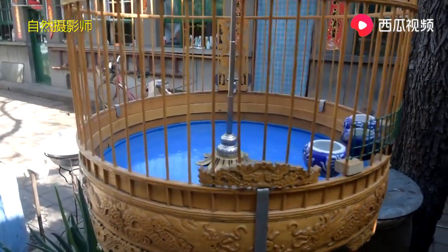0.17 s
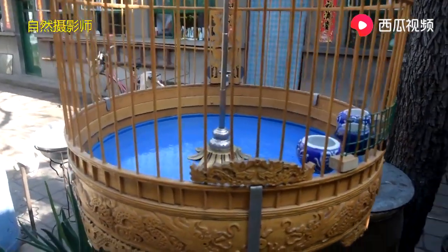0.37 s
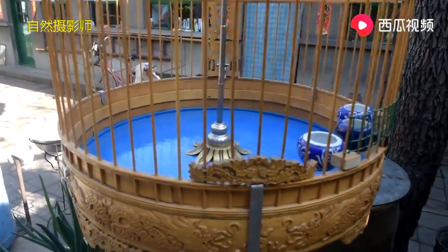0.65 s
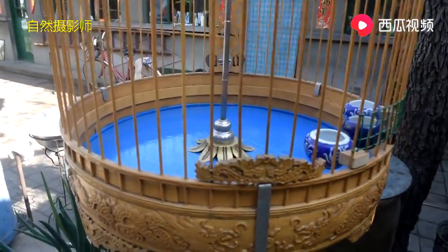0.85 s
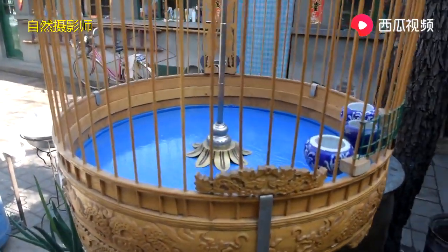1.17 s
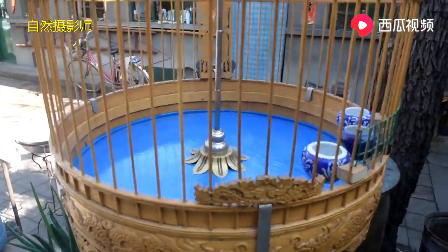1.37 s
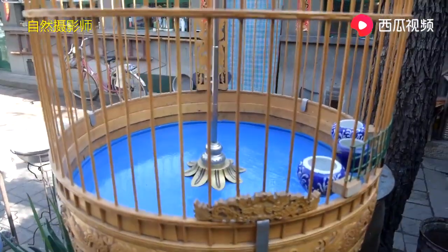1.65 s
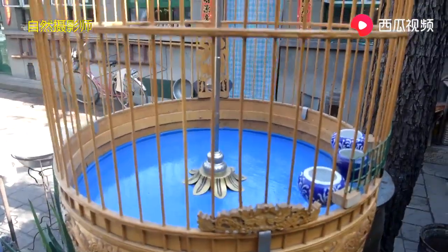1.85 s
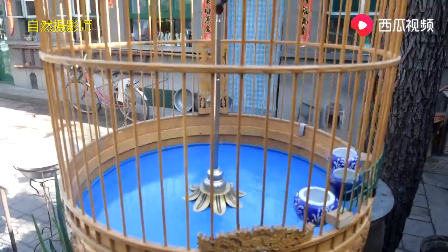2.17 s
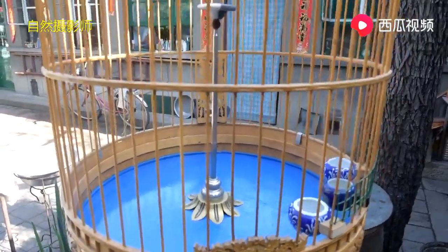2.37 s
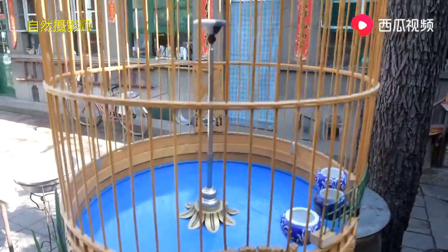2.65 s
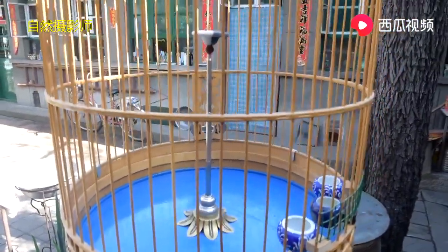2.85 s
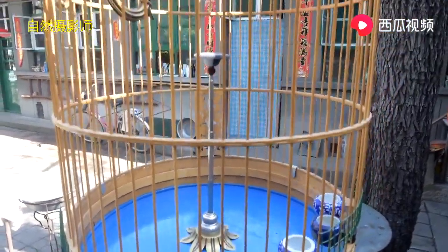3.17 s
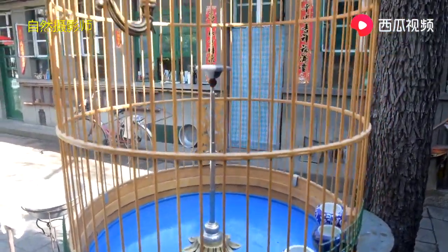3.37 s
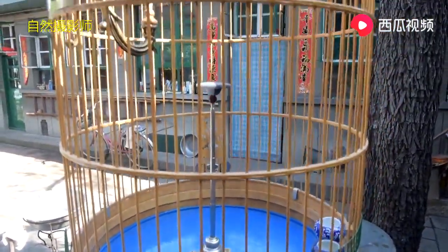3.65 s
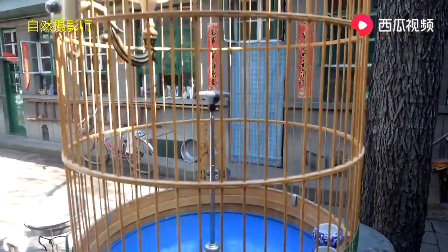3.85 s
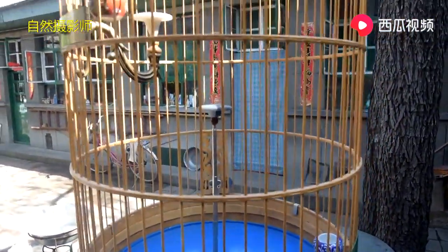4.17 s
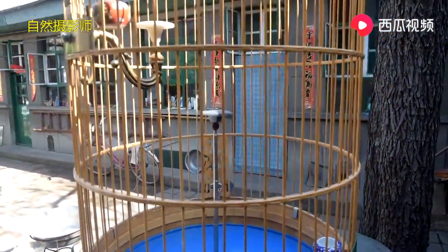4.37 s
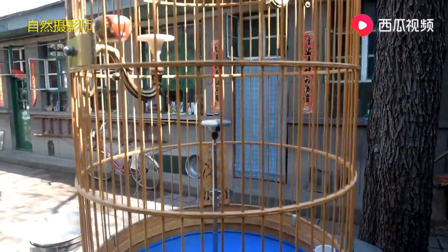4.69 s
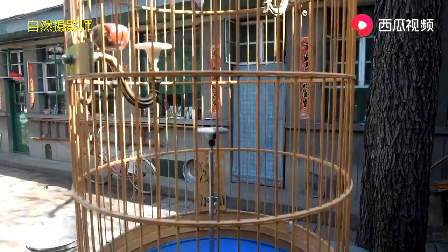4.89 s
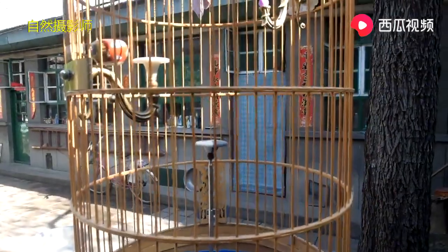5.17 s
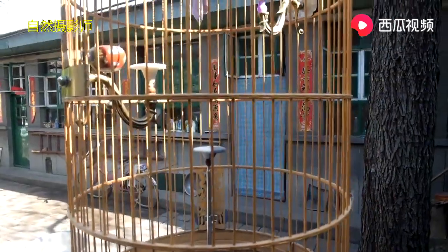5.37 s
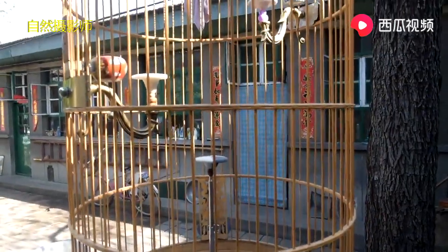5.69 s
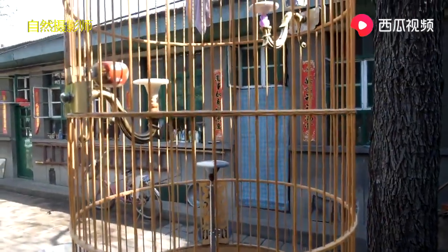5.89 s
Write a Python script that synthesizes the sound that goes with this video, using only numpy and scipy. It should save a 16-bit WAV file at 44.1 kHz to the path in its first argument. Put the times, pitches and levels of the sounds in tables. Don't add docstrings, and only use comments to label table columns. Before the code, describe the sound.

Lively high-pitched birdsong, near and bright, comes in quick clusters separated by short gaps. Pure whistles glide, arch and plunge; buzzy, raspy chirps and weak peeps fall between them. The notes smear slightly in a brief courtyard reverberation. The quiet background holds a constant soft hiss, distant vehicle rumble rising and falling, a muffled stir after two seconds and lighter ones later.

```python
import sys
import numpy as np
from scipy import signal
from scipy.fft import rfft, irfft
from scipy.io import wavfile
from scipy.ndimage import uniform_filter1d

SR = 44100
rng = np.random.default_rng(int(sys.argv[2]) if len(sys.argv) > 2 else 0)


def linear_from_db(decibels):
    return 10 ** (np.asarray(decibels, float) / 20)


def wav_out(sig):
    wavfile.write(sys.argv[1], SR, np.round(np.clip(np.atleast_2d(sig).T, -1, 1) * 32767).astype(np.int16))


N = 265923


def evened(x):
    return x / np.sqrt(np.mean(x ** 2) + 1e-20)


def read(points, hz):
    f, value = np.transpose(points)
    return np.interp(np.log(hz + 1), np.log(f + 1), value)


def add(mix, s, sound):
    at = round(s * SR)
    sound = sound[max(-at, 0):]
    part = mix[max(at, 0):][:len(sound)]
    part += sound[:len(part)]


def colour(x, points):
    hz = np.fft.rfftfreq(len(x), 1 / SR)
    return irfft(rfft(x) * linear_from_db(read(points, hz)), len(x))


def controls(rows):
    s, *columns = np.transpose(rows)
    t = np.arange(s[0], s[-1], 1 / SR)
    smooth = [uniform_filter1d(np.interp(t, s, c), size=130, mode="nearest") for c in columns]
    return s[0], signal.windows.tukey(len(t), .4), smooth


def phase(hz, jitter):
    wobble = evened(uniform_filter1d(rng.standard_normal(SR // 8), size=60))[:len(hz)]
    return 2 * np.pi * np.cumsum(hz * (1 + jitter * wobble)) / SR


def flutter(count, size):
    once = uniform_filter1d(rng.standard_normal(SR // 8), size)
    return evened(uniform_filter1d(once, size))[:count]


def chirp(rows, hoarsest, beak_hz, tilt_db, beak_db, leak_db):
    # hz [Hz], gain_db [dB]
    throat = [(1000, -37), (2150, -35), (2350, -12), (3600, -0.5), (4700, -11), (6300, -14), (9300, -24),
              (10200, -31.5), (12000, -36), (15700, -53.5)]
    # hz [Hz], gain_db [dB]
    leak = [(900, -50.5), (1400, -16.5), (1900, -4.5), (2400, 4), (3300, -29)]
    s, edge, (hz, db, rough) = controls(rows)
    turn = phase(hz, jitter=.012)
    rough = np.clip(rough, 0, hoarsest)
    folds = sum(np.cos(k * turn) * (k * hz < SR / 2.5) for k in range(1, 13))
    noise = rng.standard_normal(SR // 8)[:len(hz)] * (1 + 2.1 * np.cos(turn))
    drive = np.sqrt(1 - rough) * evened(folds) + np.sqrt(rough) * noise
    beak = [(1000, -2 * tilt_db), (4000, 0), (16000, 2 * tilt_db)]
    ring = [(beak_hz * .8, 0), (beak_hz, beak_db), (beak_hz * 1.2, 0)]
    through_beak = colour(colour(colour(drive, throat), beak), ring)
    voiced = through_beak + linear_from_db(leak_db) * colour(drive, leak)
    return s, linear_from_db(db) * edge * evened(voiced)


def chirped(start, gesture, hz, db, beak_hz):
    # after_start_s [s], rate_share [ratio], level_db [dB], roughness [0-1]
    scold = [(0, .88, 3, 0.42), (.04, 0.96, 2.5, 0.17), (.06, 1, -7.5, 0.04), (.085, 1.32, -8, 0.1)]
    peep = [(0, .86, -17.5, .7), (.018, .99, -1, 1), (.036, 1.09, -20, .6)]
    mutter = [(0, .84, -7.5, .7), (.039, .99, -1.5, .6), (.055, 1.08, -20, .45)]
    rasp = [(0, .88, -30, .4), (.03, .93, -14, .2), (.045, .96, -1, .05), (.062, 1.04, -2, .12),
            (.078, 1.2, -1, .25), (.096, 1.27, -10, .35)]
    squeak = [(0, .89, -36, .4), (.026, .95, -13, .15), (.043, .99, -1, .03), (.06, 1.2, -3, .05),
              (.072, 1.25, -22, .2)]
    buzz = [(0, .86, -14, .5), (.025, .92, -6, .4), (.048, .99, 0, .12), (.08, 1.01, -4, .1),
            (.1, 1.02, -16, .2)]
    beak_settings = {"scold": (.3, 2.5, 15, -58.5), "peep": (.8, 7, 10, -4.5),
                     "mutter": (.7, 11.5, 18, 0.5), "rasp": (2.43, 1.5, 1.5, -33),
                     "squeak": (4.6, 9.5, 10, -19.5), "buzz": (3.5, 8.5, 8, -16.5)}
    repertoire = dict(scold=scold, peep=peep, mutter=mutter, rasp=rasp, squeak=squeak, buzz=buzz)
    rows = np.array(repertoire[gesture]) * [1, hz, 1, 1] + [start, 0, db, 0]
    hoarsest, *setting = beak_settings[gesture]
    return chirp(rows, hoarsest, beak_hz, *setting)


def noise_bed(points, level_db, patchy_db):
    # hz [Hz], coherence [ratio]
    likeness = [(20, .99995), (150, .99995), (350, .9994), (600, .975), (1100, .5), (2000, .2), (15000, .1)]
    frames, hz = N // 256 + 5, np.fft.rfftfreq(1024, 1 / SR)
    a, b, c, d, patches = rng.standard_normal((frames, 513, 5)).T
    patches = evened(uniform_filter1d(uniform_filter1d(patches, size=8, axis=0), size=14, axis=1))
    same = np.clip(read(likeness, hz), -1, 1)[:, None]
    left = a + 1j * b
    right = same * left + np.sqrt(1 - same ** 2) * (c + 1j * d)
    z = np.array([left, right]) * linear_from_db(read(points, hz)[:, None] + patchy_db * patches)
    return linear_from_db(level_db) * evened(signal.istft(z, nperseg=1024, noverlap=768)[1][:, :N])


def hiss():
    # hz [Hz], density_db [dB per Hz]
    hiss_colour = [(12, -30), (20, -23.5), (76, -6), (119, -8.5), (220, -7.5), (275, -11.5), (299, -11.5),
                   (709, -17.5), (2780, -30), (3110, -21), (3670, -27.5), (4590, -22), (5900, -29),
                   (7380, -28.5), (15700, -39.5)]
    return noise_bed(hiss_colour, level_db=-56, patchy_db=0.7)


def rumble():
    # middle_s [s], length_s [s], rise_db [dB]
    vehicles = [
        (.22, .2, 9),
        (1.4, 0.32, 2.2),
        (2.38, 0.086, 6),
        (3.14, .15, 6.9),
        (3.7, .15, 5.7),
        (5.25, 0.16, 4),
    ]
    t = np.arange(N) / SR
    swell_db = sum(db * np.exp(-((t - s) / length * 2) ** 2) for s, length, db in vehicles)
    drone = [(40, -60.5), (65, -13.5), (80, -2.5), (105, -21.5), (150, -42.0), (400, -106.5)]  # (Hz, dB)
    return noise_bed(drone, -59.5 + swell_db, patchy_db=2.5)


def whistle(rows):
    multiples = [2 / 3, 1, 1.5, 5 / 3, 2]
    parts_db = [-59, 0.0, -33, -40, -18.5]
    s, edge, (hz, db) = controls(rows)
    turn = phase(hz, jitter=0.015)
    flow = linear_from_db(db) * edge
    glide = uniform_filter1d(abs(np.gradient(np.log(hz))) * SR, size=300)
    hoarse = np.clip(.14 + .012 * glide, 0, 1.3) * flutter(count=len(hz), size=16)
    tone = sum(linear_from_db(d) * (1 + k ** 2.2 * hoarse) * np.sin(k * turn) for k, d in zip(multiples, parts_db))
    return s, flow * np.sqrt(2) * tone, flow * (1 + 0.012 * glide)


def whistled(start, gesture, hz, db, slowness):
    # after_start_s [s], pitch_share [ratio], level_db [dB]
    slide = [(0, 1.13, -7), (.022, 1.014, 0), (.055, .97, -3), (.08, 0.81, -7.5)]
    plunge = [(0, 1.04, 0), (.025, 0.98, -5), (.05, 0.87, -2.5), (.063, .55, -6), (.08, 1.02, -13.5)]
    fall = [(0, 1.05, -8), (.02, 1.01, -3.5), (.045, .995, 0.5), (.07, .99, -3), (.09, .975, -7)]
    arch = [(0, .8, -16.5), (.018, .88, -10.5), (.03, 1.01, -2.5), (.062, .98, -3), (.088, .92, -11)]
    dip = [(0, 1.03, -2), (.022, 0.99, -4), (.036, 0.82, -4), (.049, .51, -13), (.054, .6, -33.5),
           (.061, .885, -3), (.067, .885, -1.5), (.095, .875, -15.5)]
    lead = [(0, .8, -20), (.012, .99, -5), (.024, 1, 0), (.034, .995, -1), (.045, .96, -12)]
    drop = [(0, 0.93, 1), (.02, .995, -2), (.045, .93, -5), (.075, .89, -6.5)]
    rise = [(0, .79, -5), (.03, .91, -4), (.05, 1.005, -4.5), (.075, 1.02, 2.5)]
    repertoire = dict(slide=slide, plunge=plunge, fall=fall, arch=arch, dip=dip,
                      lead=lead, drop=drop, rise=rise)
    return whistle(np.array(repertoire[gesture]) * [slowness, hz, 1] + [start, 0, db])


def ticks():
    # start_s [s], peak_db [dB], mode_hz [Hz]
    taps_on_bar = [
        (0.7707, -31, 6100),
    ]
    out, t = np.zeros(N), np.arange(300) / SR
    for s, db, hz in taps_on_bar:
        ring = np.sin(2 * np.pi * hz * t)
        ring = ring + 0.46 * np.sin(2 * np.pi * 8700 * t) + 0.37 * np.sin(2 * np.pi * 3200 * t)
        onset = 1 - np.exp(-t / 0.00023)
        add(out, s, linear_from_db(db - 60 * t / 0.0054) * onset * ring)
    return out


def pair(rows):
    multiples = [(2, 0), (1, 1), (0, 2), (-1, 2), (3, 0)]
    parts_db = [-1.5, -2.5, -9.5, -13.5, -3.5]
    s, edge, (low_hz, high_hz, low_db, high_db) = controls(rows)
    low, high = phase(low_hz, jitter=.014), phase(high_hz, jitter=.016)
    both = linear_from_db(low_db + high_db + 29.0)
    mixed = sum(linear_from_db(d) * np.sin(m * low + n * high) for (m, n), d in zip(multiples, parts_db))
    voices = linear_from_db(low_db) * np.sin(low) + linear_from_db(high_db) * np.sin(high) + both * mixed
    hoarse = .22 * flutter(count=len(low), size=14)
    return s, np.sqrt(2) * edge * voices * (1 + hoarse), linear_from_db(-1) * both * edge


def paired(start, gesture, low_hz, high_hz, db):
    # after_start_s [s], low_share [ratio], high_share [ratio], low_db [dB], high_db [dB]
    level = [(0, 1.2, 1.01, -26.5, -0.5), (.02, .97, 1.1, -36, -23.5), (.032, .95, .96, -15.5, -7),
             (.042, 1.01, .995, -10.5, 0), (.062, .95, 1.02, -28, -40)]
    step = [(0, .87, .97, -25, -3), (.025, .89, .98, -21, -15), (.036, .98, 1.005, -4, 5.5),
            (.046, 1.01, .99, -10.5, -16), (.06, .96, .96, -30, -31)]
    rows = np.array(dict(level=level, step=step)[gesture])
    return pair(rows * [1, low_hz, high_hz, 1, 1] + [start, 0, 0, db, db])


def lark():
    # start_s [s], gesture [name], pulse_hz [Hz], level_db [dB], beak_hz [Hz]
    chirp_notes = [(-.02, "scold", 1754, -19.5, 4290), (1.518, "peep", 1255, -31.5, 5320),
                   (1.632, "peep", 1302, -34, 5660), (1.738, "peep", 1302, -34, 5650),
                   (1.786, "rasp", 1288, -20, 8900), (2.166, "squeak", 1437, -23, 5618),
                   (2.797, "buzz", 1493, -21, 4580), (3.514, "rasp", 1279, -19, 9360),
                   (4.012, "mutter", 1285, -40.5, 7220), (4.088, "mutter", 1378, -43.5, 2884),
                   (4.182, "mutter", 1368, -38, 6800), (5.106, "rasp", 1271, -19.5, 8800),
                   (5.288, "peep", 1474, -35, 6176), (5.373, "peep", 1477, -42, 4400),
                   (5.682, "buzz", 1467, -21.5, 4530)]
    # start_s [s], gesture [name], pitch_hz [Hz], level_db [dB], slowness [ratio]
    whistle_notes = [(.032, "slide", 5516, -14, 0.89), (.103, "plunge", 6660, -14, 1),
                     (1.097, "fall", 5742, -14, 1), (1.217, "arch", 4929, -13.5, 0.99),
                     (1.325, "dip", 6548, -12, 0.99), (2.898, "drop", 6360, -11.5, 0.98),
                     (3.012, "arch", 5011, -14.5, 0.991), (3.12, "dip", 6536, -11, 1),
                     (4.245, "fall", 5692, -15, 0.99), (4.354, "arch", 4960, -13.5, 0.95),
                     (4.465, "dip", 6486, -12, 0.9), (4.61, "rise", 5468, -13.5, 1),
                     (5.785, "drop", 6274, -13, 0.98), (5.897, "arch", 5026, -14.5, 0.86),
                     (6.001, "dip", 6550, -10, 0.95), (2.783, "lead", 4097, -19.5, 1),
                     (5.665, "lead", 3828, -21, 1)]
    # start_s [s], gesture [name], low_hz [Hz], high_hz [Hz], level_db [dB]
    pair_notes = [
        (.813, "level", 4055, 5676, -28.5),
        (0.908, "step", 4455, 5794, -28.5),
        (2.525, "level", 3890, 5690, -26.5),
        (2.612, "step", 4520, 6227, -25.5),
    ]
    # hz [Hz], gain_db [dB]
    windpipe = [(2400, -42), (3050, -8.5), (3350, -2), (6850, -1.5), (7200, -14.5), (7800, -2.5),
                (9600, -7.5), (12200, -7.5), (13200, -34), (15500, -17)]
    # hz [Hz], gain_db [dB]
    breath_colour = [(2200, -48.5), (2900, -14.5), (3300, -22.5), (4300, -12), (5500, -6), (6500, -27),
                     (7300, -17), (8500, -6), (9500, -6), (10000, -37.5), (12000, -11.5), (13200, -24),
                     (15500, -18)]
    pure, flow, buzzy = np.zeros((3, N + SR // 4))
    for row in chirp_notes:
        add(buzzy, *chirped(*row))
    tonal = [whistled(*row) for row in whistle_notes] + [paired(*row) for row in pair_notes]
    for s, sound, air in tonal:
        add(pure, s, sound)
        add(flow, s, air)
    breath = colour(flow * rng.standard_normal(len(flow)), breath_colour)
    return colour(pure, windpipe) + buzzy + linear_from_db(-8.5) * breath


def courtyard(x, direct_db, shared):
    # hz [Hz], t60_s [s]
    walls = [(2000, 0.3), (5300, 0.356), (14000, 0.26)]
    port_lag = 10
    slots = np.arange(80, SR // 2, 20)
    at = slots + rng.integers(0, 20, (3, len(slots)))
    taps = np.zeros((3, SR // 2 + 40))
    np.put_along_axis(taps, at, rng.choice([-1., 1.], at.shape), 1)
    shared = np.clip(shared, 0, 1)
    common = shared * np.array([taps[2], np.roll(taps[2], port_lag)])
    taps = common + np.sqrt(1 - shared ** 2) * taps[:2]
    hz, t, z = signal.stft(taps, SR, nperseg=128)
    tail = signal.istft(z * linear_from_db(-60 * t / read(walls, hz)[:, None]), SR, nperseg=128)[1]
    tail = tail * (1 - np.exp(-np.arange(tail.shape[1]) / SR / .006))
    tail = tail / np.linalg.norm(tail, axis=1, keepdims=True)
    tail[[0, 1], [0, port_lag]] += linear_from_db(direct_db)
    return signal.fftconvolve(x[None], tail, axes=1)[:, :N]


def rustle():
    # hz [Hz], density_db [dB per Hz]
    rustle_colour = [(120, -57.5), (200, -4.5), (323, -2), (479, -7.5), (992, -14.5), (1630, -15),
                     (2400, -14), (3120, -42), (5280, -120)]
    # start_s [s], rise_db [dB], fade_s [s]
    movements = [
        (2.3, 16.3, 0.34),
        (3.57, 7.4, 0.034),
        (4.27, 10, 0.127),
        (5.15, 3.9, 0.05),
        (5.74, 9.17, 0.058),
        (5.98, 7.3, .1),
    ]
    t, attack_s = np.arange(N) / SR, 0.017
    stir_db = sum(db * np.clip((t - s) / attack_s, 0, 1) * np.exp(-abs(t - s) / fade)
                  for s, db, fade in movements)
    return noise_bed(rustle_colour, -61.5 + stir_db, patchy_db=3)


def scene():
    bird = courtyard(lark(), direct_db=-5.5, shared=.45)
    port_gain = linear_from_db(np.array([[1.1], [.5]]))
    return bird * port_gain + hiss() + rumble() + rustle() + ticks()


def unmasked(x, margin_db, up_db, down_db):
    z_pad = np.pad(x, ((0, 0), (0, 2048)), "reflect")
    frame = dict(window="cosine", nperseg=2048, noverlap=1024)
    hz, t, z = signal.stft(z_pad, SR, boundary="even", **frame)
    band = np.digitize(hz, np.geomspace(1300, 15800, 38))
    k = np.arange(band.max() + 1)
    member = (band == k[:, None]) / np.bincount(band)[:, None]
    level_db = 10 * np.log10(member @ (abs(z) ** 2).mean(0) + 1e-20)
    step = k[:, None] - k
    spread_db = margin_db + np.where(step > 0, up_db * step, -down_db * step)
    whim_db = 3 * rng.standard_normal(level_db.shape)
    hidden = level_db + whim_db < (level_db[None] - spread_db[:, :, None]).max(1)
    hidden[0], hidden[-1] = False, True
    return signal.istft(z * ~hidden[band], SR, **frame)[1][:, :N]


def top_cut(x):
    return signal.sosfilt(signal.butter(12, 15810, fs=SR, output="sos"), x)


def record(dry):
    # hz [Hz], gain_db [dB]
    left_lift = [(600, 0), (1500, .8), (3000, .3), (5500, -.6), (9000, 2.6), (13000, 3.6)]
    ports = np.array([colour(dry[0], left_lift), dry[1]])
    return top_cut(ports)


dry = scene()
out = record(dry)
wav_out(out)
```